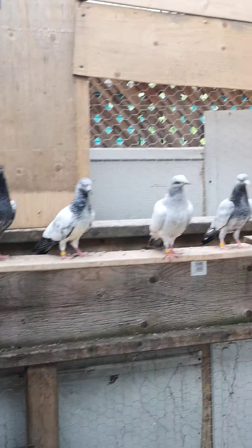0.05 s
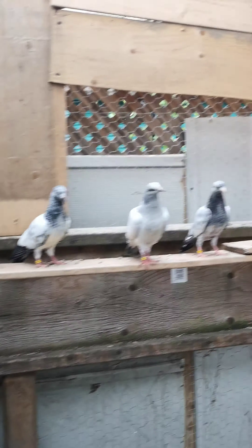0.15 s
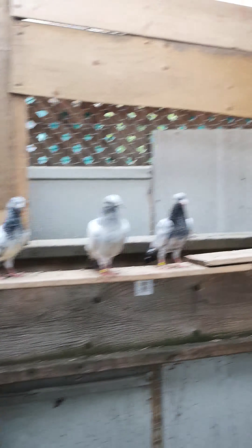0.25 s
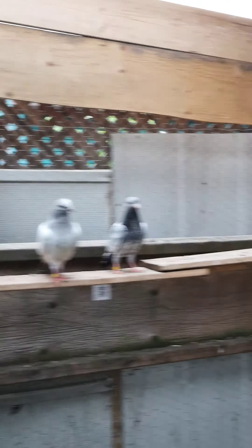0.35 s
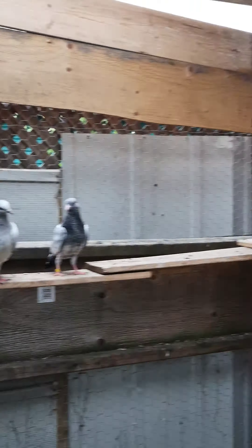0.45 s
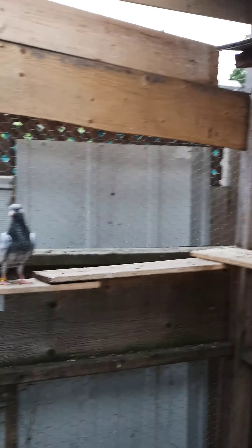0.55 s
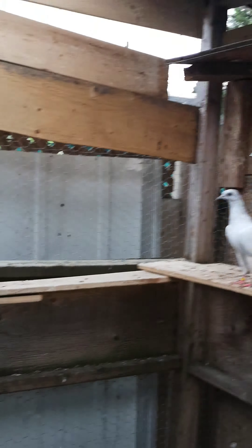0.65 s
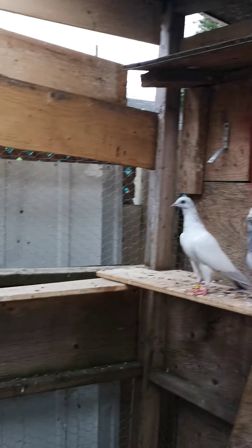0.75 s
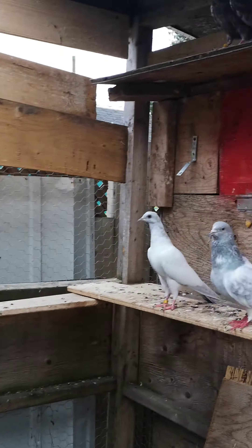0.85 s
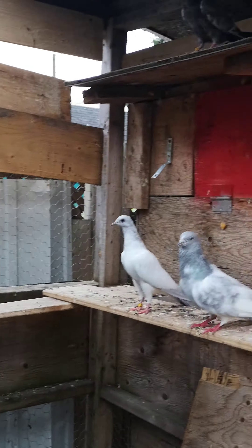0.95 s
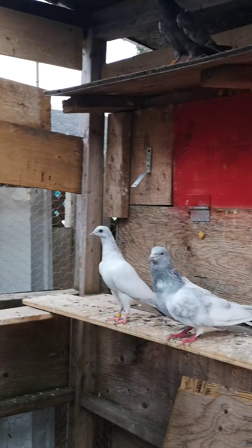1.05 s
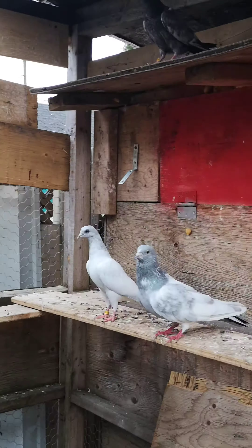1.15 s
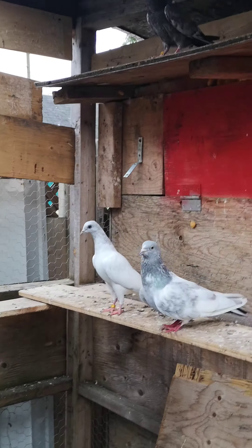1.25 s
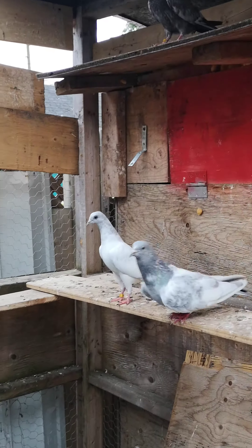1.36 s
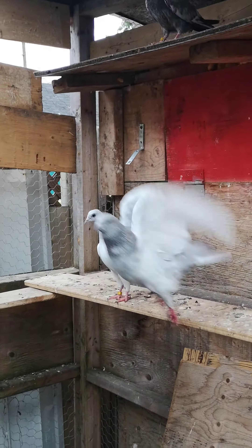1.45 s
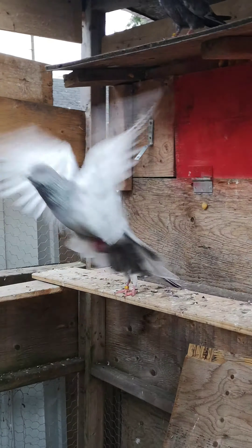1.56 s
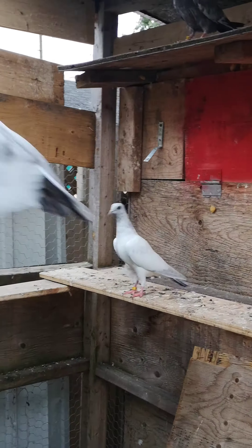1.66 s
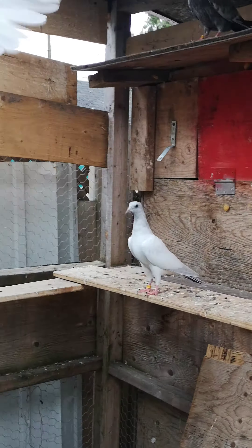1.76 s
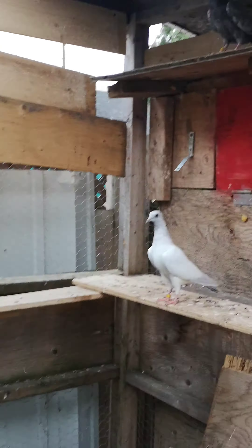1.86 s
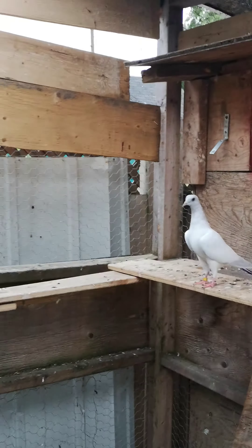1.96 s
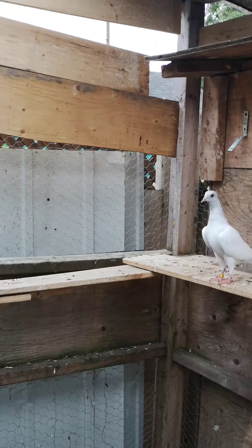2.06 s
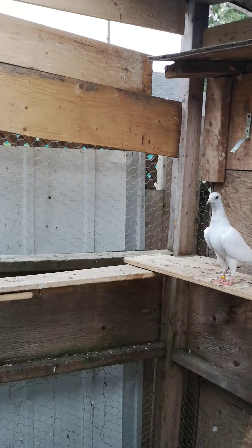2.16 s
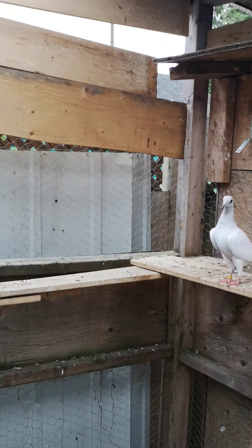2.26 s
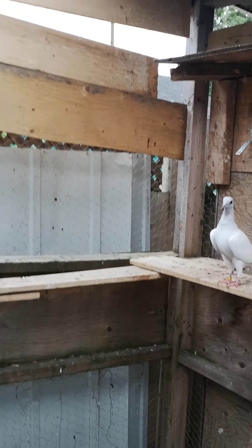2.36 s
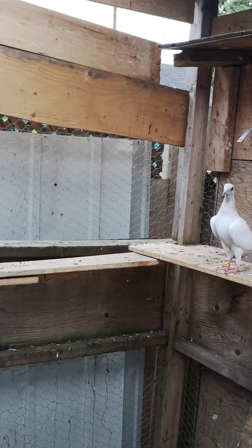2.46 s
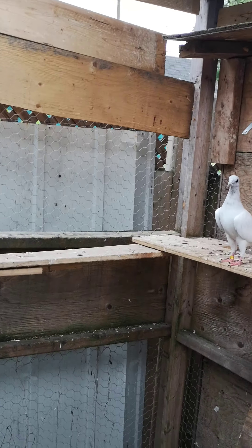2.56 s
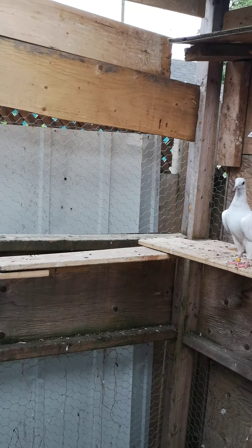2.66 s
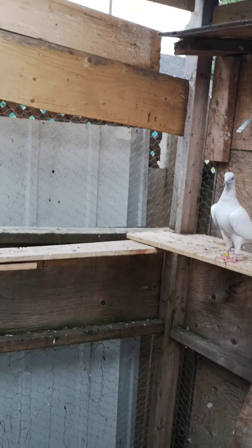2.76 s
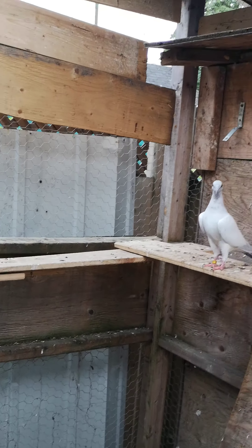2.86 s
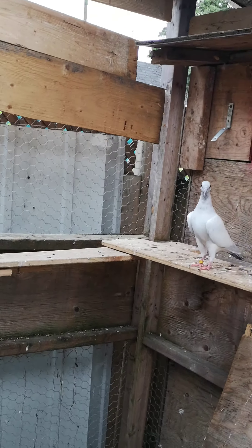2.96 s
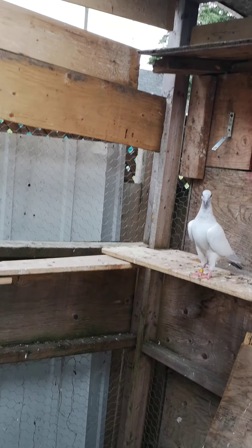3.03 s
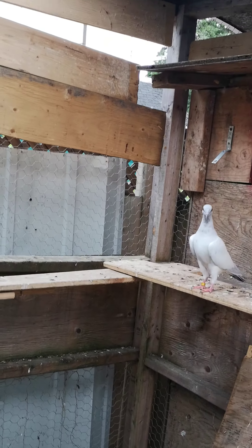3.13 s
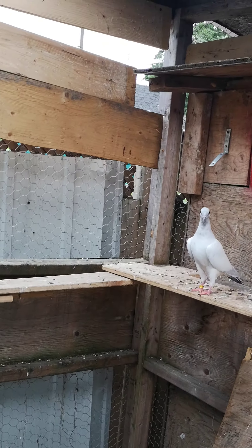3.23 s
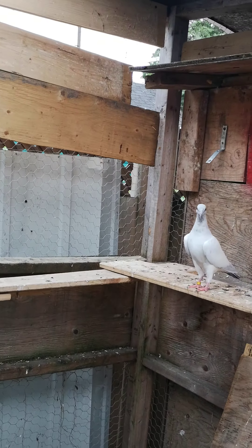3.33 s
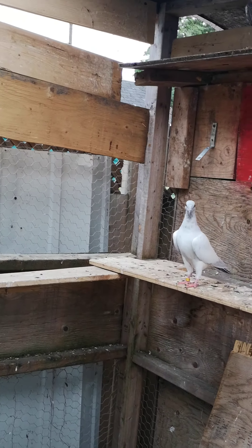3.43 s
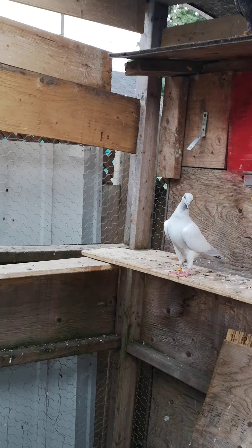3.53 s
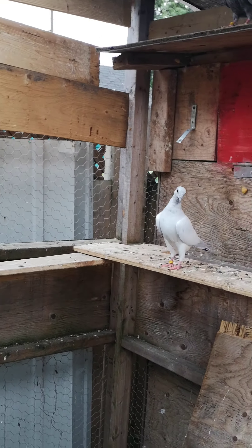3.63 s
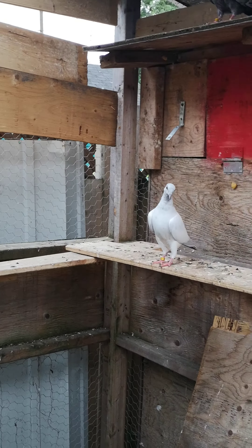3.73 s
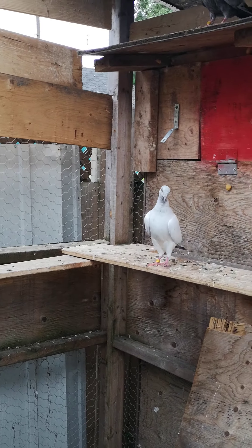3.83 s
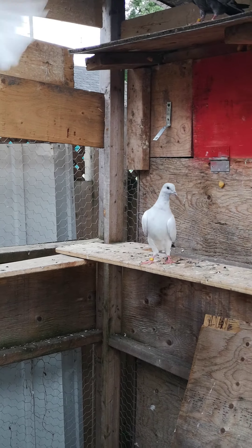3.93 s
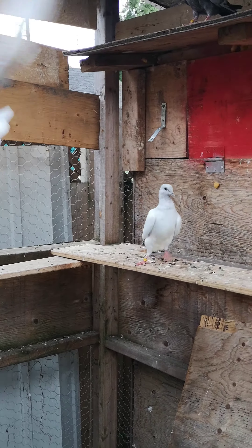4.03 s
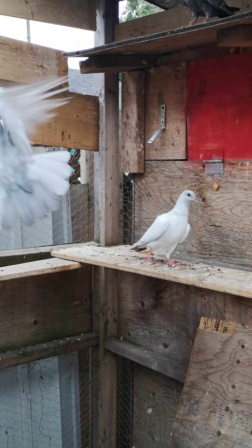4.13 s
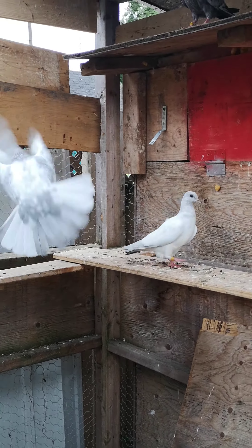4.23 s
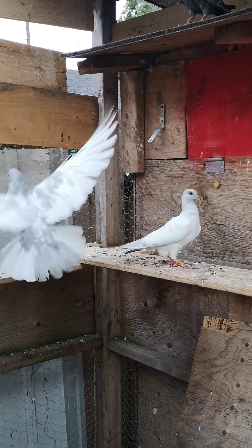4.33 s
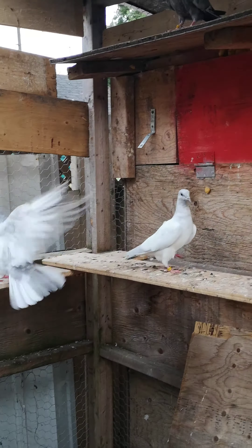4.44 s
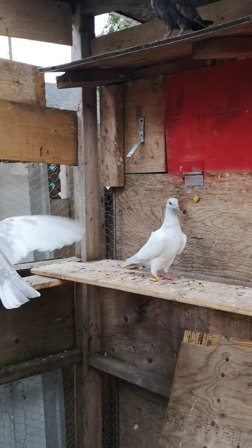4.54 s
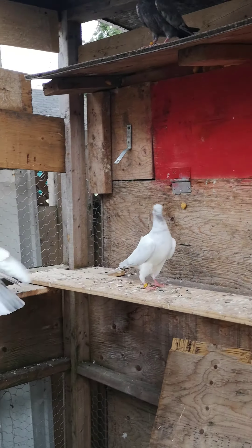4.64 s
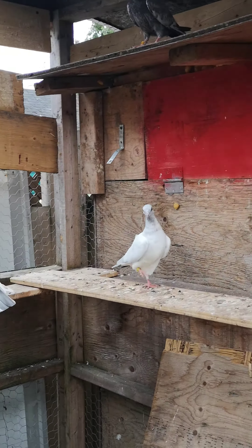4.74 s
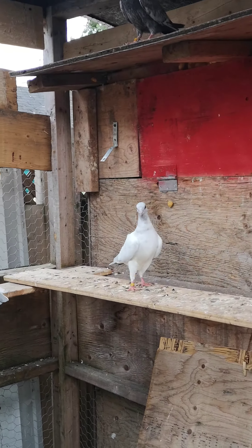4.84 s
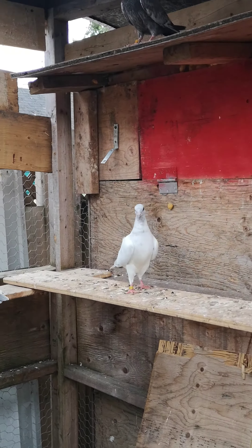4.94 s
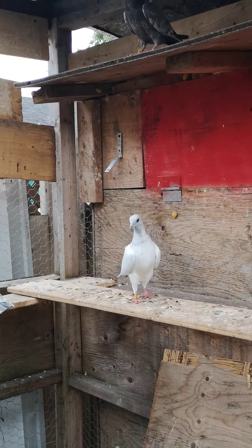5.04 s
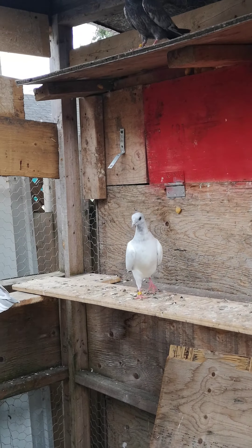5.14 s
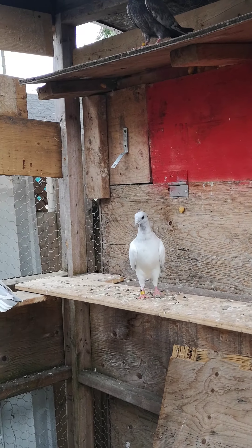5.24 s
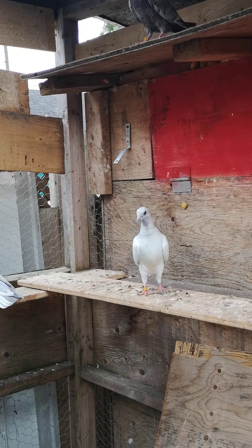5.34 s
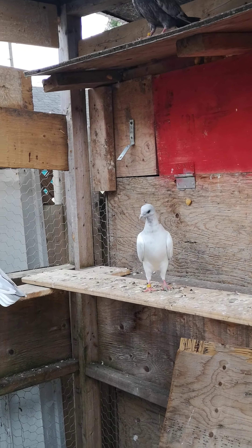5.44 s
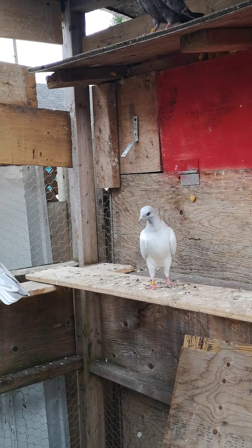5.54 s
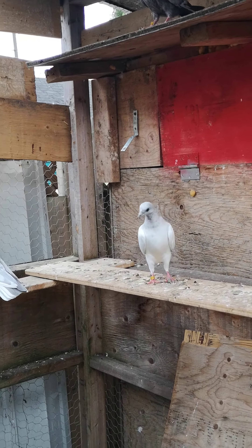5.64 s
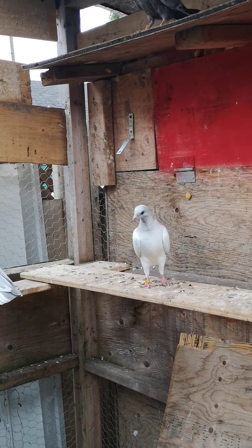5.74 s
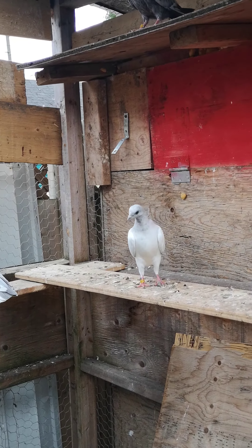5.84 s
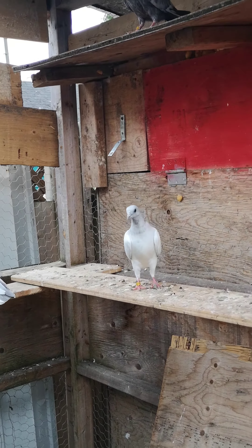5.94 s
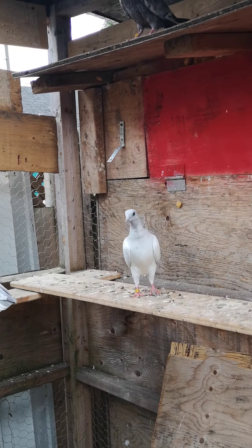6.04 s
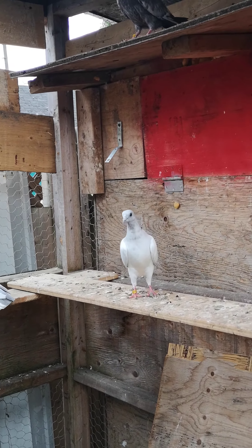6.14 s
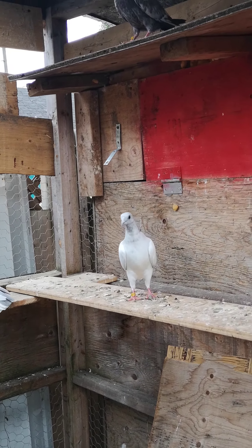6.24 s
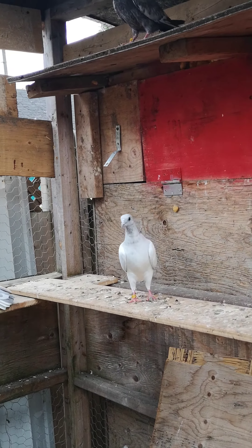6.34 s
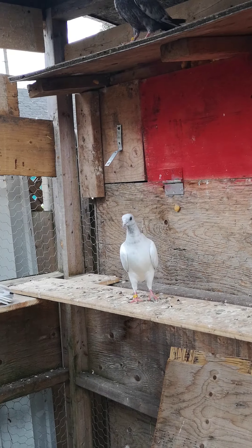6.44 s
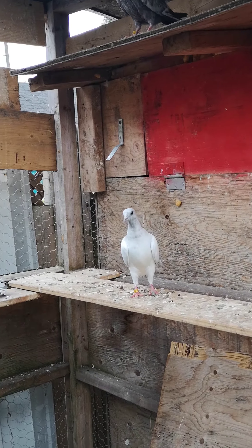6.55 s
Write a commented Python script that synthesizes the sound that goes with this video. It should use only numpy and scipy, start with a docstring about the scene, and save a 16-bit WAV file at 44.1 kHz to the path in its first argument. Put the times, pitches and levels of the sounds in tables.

```python
"""Pigeon fluttering in a wooden loft

A pigeon takes off and flutters about for three seconds, nearly seven wingbeats a second.
Wing-tip claps (noise bursts with echoes) open the beats; half a beat later the flight feathers whistle
(wavering sines) and swish (shaped noise), the plumage rustles and a puff of air leaves the wings.
Gusts buffet the microphone, claws tick before and after the flight; a machine hums and drones outside,
over a steady background hiss.
"""
import sys
import numpy as np
from scipy import signal
from scipy.fft import rfft, irfft
from scipy.io import wavfile

SR = 44100
rng = np.random.default_rng(int(sys.argv[2]) if len(sys.argv) > 2 else 0)


def log_audio(samples):
    """Write samples as a 16-bit WAV file to the path given in sys.argv[1]."""
    # one column per channel
    frames = np.atleast_2d(samples).T
    # limit to full scale, then quantise
    limited = np.clip(frames, -1, 1)
    pcm = np.round(limited * 32767).astype(np.int16)
    wavfile.write(sys.argv[1], SR, pcm)


N = 290619
TIME_S = np.arange(N) / SR

# All dB are relative levels ahead of the mix gains in scene().
# Wingbeats. Each row: clap time in seconds, clap level in dB, low body re clap in dB, left-right pan in dB,
# contact time in seconds, feather pitch in Hz, whistle level in dB, swish (and overtone) level in dB.
WINGBEATS = [(1.5264, -25, -8, -6, 0.0065, 880, -39.5, -34),
             (1.6448, -6, -13, -1.5, 0.00086, 859, -40, -37),
             (1.7903, -13, -8, -2, 0.0047, 780, -39.5, -35.5),
             (1.9631, -18.5, -4, 0.5, 0.00074, 822, -43.5, -37.5),
             (2.1384, -13, -30, -3, 0.00053, 872, -41.5, -38.5),
             (2.2876, -23.5, -6, -2, 0.0019, 950, -35, -35),
             (2.4276, -22, -9.5, -0.5, 0.0049, 788.5, -39.5, -44.5),
             (2.5893, -12, -11, -2.5, 0.0033, 726, -46.5, -49),
             (2.745, -31.5, -5.5, -4, 0.0038, 1033, -40, -45.5),
             (2.8748, -9.5, -4, -1, 0.00088, 855, -54.5, -58),
             (2.999, -19.5, -6, -2, 0.0032, 759, -39.5, -36.5),
             (3.092, -29, -1.5, -2.5, 0.013, 909, -36.5, -35.5),
             (3.2237, -16.5, -15.5, -3, 0.0032, 812.7, -42, -39.5),
             (3.408, -41, -20, -1, 0.0061, 854, -35.5, -42.5),
             (3.5666, -14, -4.5, 0, 0.0012, 842, -38.5, -41.5),
             (3.7209, -13.5, -7, -2, 0.002, 770, -45.5, -43.5),
             (3.875, -11.5, -4, 0, 0.0024, 790.6, -37, -39.5),
             (4.0488, -20, -22, -2.5, 0.0019, 877, -49, -37),
             (4.2135, -22, -16, -3.5, 0.0072, 900, -42, -37), (4.356, -16, -11, -3, .0051, 770, -51, -48.5),
             (4.503, -20, -6.5, -3, 0.0072, 744, -68, -66)]
# A wing grazes the boards between beats. Each row: start in seconds, level in dB, low body re level in dB,
# left-right pan in dB, contact time in seconds.
GRAZES = [(1.5934, -21, -18, -7, 0.0017), (1.826, -24, -0.5, -0.5, 0.0094), (1.992, -36.5, 7, -3, 0.0097),
          (2.0475, -38, -14, 4, 0.0035), (2.8215, -20.5, -1.5, -.5, 0.0059),
          (2.9556, -19.5, -4.5, -2, 0.021), (3.041, -36.5, 7.5, -6, 0.014)]
# Crack of quills, also claw scratch. Each row: frequency in Hz, spectral level in dB.
CRACK_SPECTRUM = [(300, -22.5), (1000, -11.5), (2200, -5.5), (3200, -4), (4200, -7), (5500, -2), (6400, -7),
                  (7600, -3), (8800, -7.5), (10000, -14), (14500, -28.5), (16000, -50)]
# Pop of air trapped by the wings. Each row: frequency in Hz, spectral level in dB.
BODY_SPECTRUM = [(100, -40.5), (300, -10), (500, -14), (850, -7.5), (1060, -2), (1350, -4.5), (1800, 1),
                 (2600, -1.5), (4500, -11.5), (10000, -20.5)]
# Harmonics 2 to 6 of the feather whistle. Each entry: level in dB.
OVERTONES_DB = [-0.5, 1.5, -5, -9.5, -11]
# Air swishing past the flight feathers. Each row: frequency in Hz, spectral level in dB.
SWISH_SPECTRUM = [(200, -14.5), (500, -13), (800, 5.5), (1200, -6.5), (1800, 7), (2600, -0.5), (4000, -9),
                  (7500, -14), (10000, -35.5), (16000, -56.5)]
# Rustling plumage. Each row: frequency in Hz, spectral level in dB.
FEATHER_SPECTRUM = [(200, 5), (500, -1), (1000, 1), (2000, 9), (3500, 4.5), (5500, -1), (7700, 1.5),
                    (10000, -8), (14500, -15.5), (16000, -21.5)]
# Flurries of ruffled feathers. Each row: start in seconds, level in dB, hold in seconds.
FLURRIES = [(1.546, -45.5, 0.079), (2.231, -50.5, 0.22), (2.636, -47, 0.15), (2.872, -38, 0.061),
            (2.985, -34, 0.04), (3.108, -40, 0.15), (4.209, -47.5, 0.13), (4.483, -45, 0.032)]
# Gusts as the bird passes close. Each row: start in seconds, level in dB, hold in seconds, release in seconds.
GUSTS = [(1.82, -18, .04, 0.15), (2.339, -31.5, .025, .02), (2.996, -28.5, 0.11, .05),
         (3.16, -25.5, 0.037, 0.041)]
# Large eddies at the microphone. Each row: frequency in Hz, spectral level in dB.
WIND_SPECTRUM = [(10, -17), (28, 5), (60, -5.5), (140, -10), (300, -23.5), (600, -29), (2000, -59),
                 (8000, -100)]
# Small, higher eddies. Each row: frequency in Hz, spectral level in dB.
SMALL_EDDY_SPECTRUM = [(60, -13.5), (160, -2.0), (330, -3.0), (600, -7), (1500, -12.5), (8000, -58)]
# Claws on the boards. Each row: start in seconds, level in dB, knock re scratch in dB.
CLAWS = [(0.824, -42.5, -8), (1.018, -46.5, 9.5), (1.045, -56, 10.5), (1.235, -57, -6), (1.466, -53, -20),
         (1.502, -50, -8), (4.689, -51, 13.5), (4.881, -47, -25), (5.32, -59, -6), (5.52, -62, -13.5)]
# Knock of the board. Each row: frequency in Hz, spectral level in dB.
BOARD_SPECTRUM = [(400, -37.5), (900, -3.5), (1400, 9), (1800, -2.0), (2300, 10), (3500, -11), (9000, -21)]
# Decay of the loft echoes. Each row: band centre in Hz, time to fall 60 dB in seconds.
LOFT_T60 = [(200, 0.1), (800, 0.18), (2500, 0.13), (7000, 0.14), (14000, 0.091)]
# Steady hum lines of the machine. Each row: frequency in Hz, level in dB.
HUM = [(59.6, -46), (242.0, -55.5), (323, -69.5), (403, -66)]
# Swell of the drone. Each row: time in seconds, lower resonance in dB, upper resonance in dB.
DRONE = [(0.0, -49, -39), (0.3, -50, -34), (0.78, -39, -47.5), (0.95, -49.5, -66.5), (1.4, -47.5, -62.5),
         (2.75, -43.5, -38.5), (3.5, -44.5, -38.5), (4.6, -45.5, -45.5), (5.401, -49.5, -53),
         (6.59, -51.5, -69)]
# Drone resonances. Each row: frequency in Hz, width in Hz, level in dB.
DRONE_MODES = [(178.2, 18, 0.5), (207.7, 17, -7), (237, 9, -2)]
# Machine rumble. Each row: frequency in Hz, spectral level in dB.
RUMBLE_SPECTRUM = [(10, 8.5), (25, -28), (50, -14), (90, 5), (160, 0.5), (260, 3.5), (330, -5.5),
                   (450, -18.5), (700, -48.5), (3000, -79.5)]
# Background hiss over time. Each row: time in seconds, level in dB.
HISS = [(0, -58), (0.6, -57.5), (1.3, -60.5), (4.8, -59), (5.5, -60.5), (6.59, -61)]
# Colour of the steady background hiss, with narrow microphone resonances. Each row: frequency in Hz,
# spectral level in dB.
HISS_SPECTRUM = [(290, -37), (480, -1.5), (600, -9), (790, -3), (1000, -7.5), (1400, -9), (1850, -3.5),
                 (2300, -11), (2700, -7), (3150, -15.5), (3550, -10.5), (4500, -20.5), (7400, -20),
                 (10200, -32.5), (16000, -36)]

TAKE_OFF_S, LANDING_S, FLIGHT_ATTACK_S, SETTLE_S = 1.537, 4.494, .025, .18
LONGEST_BEAT_S = .172
STROKE_PHASE, STROKE_SHARE = .505, .53   # middle and length of the downstroke, shares of the beat
# A higher stroke climbs more, a lower one falls; no climb at LEVEL_PITCH_HZ.
LEVEL_PITCH_HZ, CLIMB_PER_HZ = 716.6, .002
ARCH, WAVER = .99, .013   # pitch fall toward the stroke ends, random unsteadiness; shares of the pitch
FLIGHT_RUSTLE_DB, RUSTLE_EASES_DB_PER_S = -46, 3.5   # at take-off; feathers lie flatter as flight goes on
STROKE_RUSTLE_DB, STROKE_PUFF_DB = -6.5, -2   # relative to the swish; relative to the whistle
FLURRY_ATTACK_S, FLURRY_RELEASE_S, GUST_ATTACK_S = .015, .027, .0053
STILL_DRAUGHT_DB, FLIGHT_DRAUGHT_DB = -51.5, -40
PORT_LAG_SAMPLES = 7   # right port hears the bird later


def claps(crack_db, body_db, wet_db, brush_db):
    """Wing tips brush, then meet: a crack of quills and a pop of trapped air, each contact newly echoed."""
    crack, body = np.zeros((2, 2, N))
    for s, level_db, low_db, pan_db, contact_s, *_ in WINGBEATS + GRAZES:
        gain = from_db(level_db + pan_db * np.array([[.5], [-.5]]))
        brush = burst(contact_s * 2, grain_db=15.5)[::-1]   # reversed: swells into the contact
        brush_gain = gain * from_db(brush_db) * contact_s / .006
        add(crack, s - len(brush) / SR, brush_gain * ports(brush))
        add(crack, s, gain * slap(contact_s, wet_db))
        add(body, s, gain * from_db(low_db) * slap(contact_s, wet_db))
    return from_db(crack_db) * colour(crack, CRACK_SPECTRUM) + from_db(body_db) * colour(body, BODY_SPECTRUM)


def slap(contact_s, wet_db):
    """One contact of the wings; its echoes build up over the contact time, and a slow contact is duller."""
    tail = echoes()
    tail *= 1 - np.exp(-np.arange(tail.shape[1]) / SR / contact_s)
    tail *= from_db(wet_db) / np.sqrt(np.sum(tail ** 2) / 2)
    add(tail, 0, ports(burst(contact_s, grain_db=1.0)))
    top_hz = np.clip(np.interp(contact_s, [.002, .009], [17000, 9500]), 3000, .45 * SR)
    return signal.sosfilt(signal.butter(2, top_hz, fs=SR, output="sos"), tail)


def burst(decay_s, grain_db):
    """Feather shafts or claws meet in a cluster of snaps; a long contact starts softly. Unit energy."""
    t_s = np.arange(2048) / SR
    swell = 1 - np.exp(-t_s / (40 * decay_s ** 2))
    grains = rng.standard_normal(len(t_s)) * from_db(grain_db * rng.standard_normal(len(t_s)))
    snaps = grains * swell * np.exp(-t_s / decay_s)
    return snaps / np.sqrt(np.sum(snaps ** 2))


def downstrokes(tone_db, overtone_db, swish_db):
    """Flight feathers flutter at a pitch that arches with wing speed; the swish of air peaks just after."""
    tone, overtones, rush = np.zeros((3, N))
    pitch_hz = np.full(N, 600.)
    for s, length_s, hz, whistle_row_db, swish_row_db in stroke_plan():
        climb = CLIMB_PER_HZ * (hz - LEVEL_PITCH_HZ)
        near = np.abs(TIME_S - s) < .7 * length_s
        place = (TIME_S[near] - s) / length_s
        fluttering = np.exp(-((place + .02) / .34) ** 4)
        pitch_hz[near] = hz * (1 + climb * place - ARCH * place ** 2)
        tone[near] += from_db(whistle_row_db) * fluttering
        overtones[near] += from_db(swish_row_db) * fluttering
        rush[near] += from_db(swish_row_db) * np.exp(-((place - .02) / .28) ** 2)
    whistle = 0
    for detune in (.99, 1.01):   # the two wings never quite agree
        phase = 2 * np.pi * np.cumsum(pitch_hz * detune * (1 + WAVER * drift(700))) / SR
        lowest = from_db(tone_db) * tone * np.sin(phase + .75 * drift(350))
        upper = sum(from_db(db) * np.sin(k * phase) for k, db in enumerate(OVERTONES_DB, 2))
        wing = lowest + from_db(overtone_db) * overtones * upper
        whistle = whistle + from_db(2.5 * drift(400)) * wing
    uneven_noise = rng.standard_normal(N) * from_db(3 * drift(500))
    swish = rms_one(colour(uneven_noise, SWISH_SPECTRUM)[0])
    return whistle + from_db(swish_db) * rush * swish


def stroke_plan():
    """One downstroke amid every beat: (middle s, length s, pitch Hz, whistle dB, swish dB)."""
    s, *_, hz, whistle_db, swish_db = np.transpose(WINGBEATS)
    beat_s = np.minimum(np.diff(s, append=np.inf), LONGEST_BEAT_S)
    return zip(s + STROKE_PHASE * beat_s, STROKE_SHARE * beat_s, hz, whistle_db, swish_db)


def rustle(rustle_db, grain_db):
    """Vanes slide over each other in a rustle of tiny uneven grains, and single quills snap past each other."""
    grains = rms_one(rng.standard_normal(N) * from_db(grain_db * drift(2500)))
    quills = rms_one((rng.random(N) < 110 / SR) * rng.standard_normal(N))   # about 110 snaps a second
    feathers = rms_one(grains + .7 * quills)
    return from_db(rustle_db) * colour(feathers * stirring(stroke_width=.2), FEATHER_SPECTRUM)[0]


def stirring(stroke_width):
    """How hard the plumage is stirred: flight, downstrokes and flurries add in power."""
    flight_db = FLIGHT_RUSTLE_DB - RUSTLE_EASES_DB_PER_S * (TIME_S - TAKE_OFF_S)
    parts = [from_db(flight_db) * flight()]
    for s, length_s, _, _, swish_db in stroke_plan():
        parts.append(from_db(swish_db + STROKE_RUSTLE_DB) * bump(s, stroke_width * length_s))
    for s, db, hold_s in FLURRIES:
        parts.append(from_db(db) * envelope(s, hold_s, FLURRY_ATTACK_S, FLURRY_RELEASE_S))
    return np.sqrt(sum(part ** 2 for part in parts))


def draught(wind_db, flurry_db):
    """Eddies shed by the wings roll over the microphone; strong gusts break up more into small, higher ones."""
    eddies = rms_one(np.tanh(rms_one(colour(rng.standard_normal(N), WIND_SPECTRUM)) / 2))
    flurry = ambient(SMALL_EDDY_SPECTRUM, side_db=7.0)
    gust = airflow(puff_width=.16)
    breakup = np.sqrt(gust / gust.max())
    return from_db(wind_db) * gust * eddies + from_db(flurry_db) * gust * breakup * flurry


def airflow(puff_width):
    """Air at the microphone: still air, flight draught, a puff per downstroke and gusts add in power."""
    parts = [from_db(STILL_DRAUGHT_DB), from_db(FLIGHT_DRAUGHT_DB) * flight()]
    for s, length_s, _, whistle_db, _ in stroke_plan():
        parts.append(from_db(whistle_db + STROKE_PUFF_DB) * bump(s, puff_width * length_s))
    for s, db, hold_s, release_s in GUSTS:
        parts.append(from_db(db) * envelope(s, hold_s, GUST_ATTACK_S, release_s))
    return np.sqrt(sum(part ** 2 for part in parts))


def flight():
    """1 while the bird is in the air; fades as it folds its wings."""
    return envelope(TAKE_OFF_S, LANDING_S - TAKE_OFF_S, FLIGHT_ATTACK_S, SETTLE_S)


def claws(scratch_db, knock_db):
    """Small steps: a scratch of the claw and a knock of the board, both excited by one burst."""
    scratch, knock = np.zeros((2, N))
    for s, level_db, low_db in CLAWS:
        step = from_db(level_db) * burst(.006, grain_db=4.5)
        add(scratch, s, step)
        add(knock, s, step * from_db(low_db))
    claw = from_db(scratch_db) * colour(scratch, CRACK_SPECTRUM)
    board = from_db(knock_db) * colour(knock, BOARD_SPECTRUM)
    return (claw + board)[0]


def loft(x, wet_db):
    """Direct sound plus the echoes of the loft."""
    return ports(x) + from_db(wet_db) * signal.fftconvolve(x[None], echoes(), axes=1)[:, :N]


def echoes():
    """Dense echoes off close board walls for one bird position, dying band by band; unit energy per port."""
    t_s = np.arange(SR // 4) / SR
    white = rng.standard_normal((2, len(t_s)))
    white *= from_db(4.5 * np.exp(-t_s / .04) * rng.standard_normal(len(t_s)))   # early echoes stand apart
    hz = np.arange(len(t_s) // 2 + 1) * SR / len(t_s)
    out = 0
    for centre_hz, t60_s in LOFT_T60:
        share = at_hz([(f, f == centre_hz) for f, _ in LOFT_T60], hz)
        out = out + irfft(rfft(white) * share, len(t_s)) * from_db(-60 * t_s / t60_s)
    out = out * np.clip(t_s / .00022, 0, 1)
    return out / np.sqrt(np.sum(out ** 2, axis=1, keepdims=True))


def ports(x):
    """Direct sound reaches the right port a little later."""
    return np.array([x, np.concatenate([np.zeros(PORT_LAG_SAMPLES), x[:-PORT_LAG_SAMPLES]])])


def machine(hum_db, drone_db, rumble_db):
    """A distant motor: steady hum lines, a drone that swells in three resonances, and rumble."""
    hum = 0
    for hz, db in HUM:
        line = np.sqrt(2) * np.sin(2 * np.pi * hz * TIME_S + .25 * drift(2))
        hum = hum + from_db(db + drift(3)) * line
    lower, upper = level(np.array(DRONE)[:, [0, 1]]), level(np.array(DRONE)[:, [0, 2]])
    swells = [lower, np.sqrt(lower * upper), upper]
    drone = 0
    for (hz, width_hz, db), swell in zip(DRONE_MODES, swells):
        flutter = drift(2 * width_hz) + 1j * drift(2 * width_hz)
        resonance = rms_one(np.real(flutter * np.exp(2j * np.pi * hz * TIME_S)))
        drone = drone + from_db(db) * swell * resonance
    rumble = ambient(RUMBLE_SPECTRUM, side_db=-8.0)
    return from_db(hum_db) * hum + from_db(drone_db) * drone + from_db(rumble_db) * rumble


def background_hiss():
    """Coloured stereo noise whose level drifts slowly."""
    return level(HISS) * ambient(HISS_SPECTRUM, side_db=.5)


def ambient(spectrum, side_db):
    """Stereo noise of the given colour, partly alike at both ports; rms 1."""
    mid, side = colour(rng.standard_normal((2, N)), spectrum)
    return rms_one(mid + from_db(side_db) * side * np.array([[1], [-1]]))


def colour(x, spectrum):
    """Causal (minimum-phase) filter with the given spectrum; white noise keeps its power."""
    size = 8192
    gain = rms_one(from_db(at_hz(spectrum, np.arange(size // 2 + 1) * SR / size)))
    cepstrum = irfft(np.log(gain))
    cepstrum[1:size // 2] *= 2   # fold to the causal side
    cepstrum[size // 2 + 1:] = 0
    impulse = irfft(np.exp(rfft(cepstrum)))
    return signal.fftconvolve(np.atleast_2d(x), impulse[None], axes=1)[:, :N]


def at_hz(points, hz):
    """Read a table on a log-frequency axis."""
    f, value = np.transpose(points)
    return np.interp(np.log(np.maximum(hz, 1)), np.log(f), value)


def envelope(start_s, hold_s, attack_s, release_s):
    """Rises to 1 at the start, holds, then dies away."""
    before_s = np.maximum(start_s - TIME_S, 0)
    after_s = np.maximum(TIME_S - start_s - hold_s, 0)
    return np.exp(-before_s / attack_s - after_s / release_s)


def bump(middle_s, width_s):
    """Bell-shaped swell with peak 1."""
    return np.exp(-((TIME_S - middle_s) / width_s) ** 2)


def drift(rate_hz):
    """Smooth chance with spread 1 that changes about rate_hz times a second."""
    return np.interp(TIME_S * rate_hz, np.arange(N), rng.standard_normal(N)) * np.sqrt(3 / 2)


def level(rows):
    """Gain at every sample from (s, dB) rows."""
    return from_db(np.interp(TIME_S, *np.transpose(rows)))


def from_db(db):
    """Decibels to gain."""
    return 10 ** (np.asarray(db) / 20)


def rms_one(x):
    """Scale to rms 1."""
    return x / np.sqrt(np.mean(x ** 2) + 1e-20)


def add(track, s, sound):
    """Mix a sound into a track at time s."""
    i = int(s * SR)
    track[..., i:i + sound.shape[-1]] += sound[..., :N - i]


def scene():
    """The bird in the loft, over the machine outside and the background hiss."""
    hits = claps(crack_db=15.5, body_db=20.5, wet_db=.5, brush_db=-15.5)
    strokes = downstrokes(tone_db=-3.5, overtone_db=-7.0, swish_db=-1.0)
    plumage = rustle(rustle_db=-3, grain_db=5)
    steps = claws(scratch_db=14.0, knock_db=13.5)
    bird = hits + loft(strokes, wet_db=-5) + loft(plumage + steps, wet_db=5)
    treble = signal.sosfilt(signal.butter(2, 6000, "high", fs=SR, output="sos"), bird)
    bird = bird + .25 * treble * np.array([[-1], [1]])   # right port faces the bird: brighter
    wind = draught(wind_db=-2.0, flurry_db=-13.5)
    outside = machine(hum_db=-.5, drone_db=.5, rumble_db=-52.5)
    return bird + wind + outside + background_hiss()


def record(dry):
    """The highest peaks are rounded and the top is cut steeply at 15.4 kHz."""
    return signal.sosfilt(signal.ellip(10, .1, 80, 15400, fs=SR, output="sos"), np.tanh(dry))


dry = scene()
out = record(dry)
log_audio(out)
```